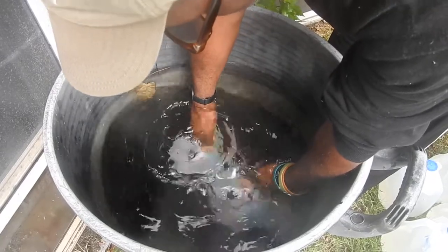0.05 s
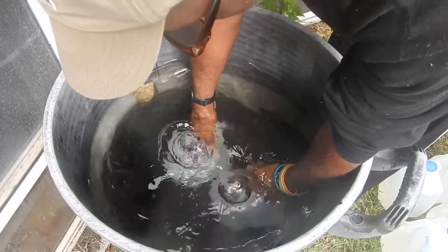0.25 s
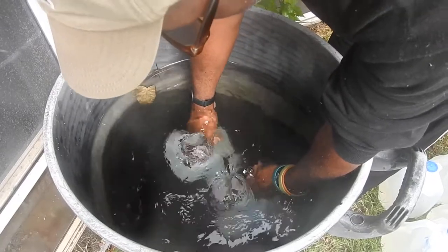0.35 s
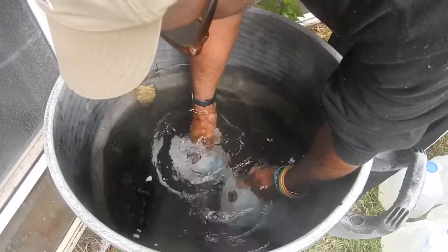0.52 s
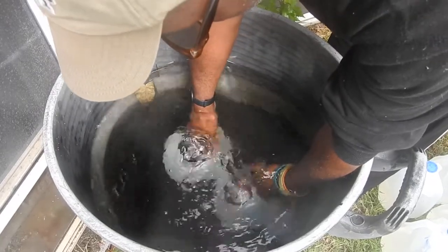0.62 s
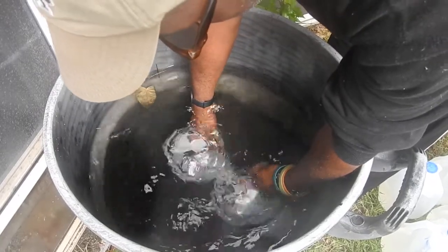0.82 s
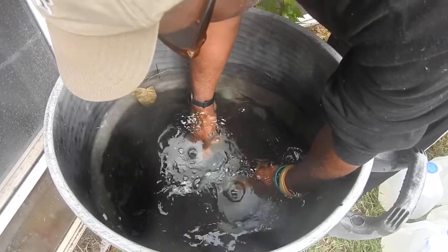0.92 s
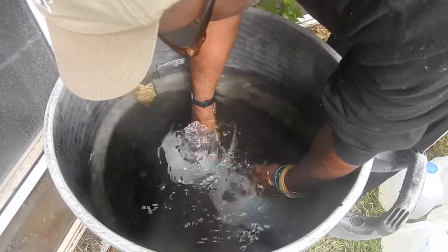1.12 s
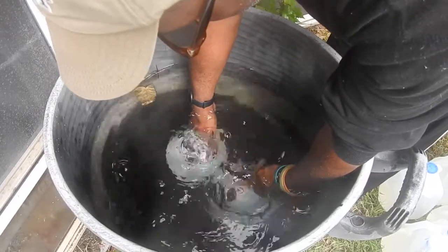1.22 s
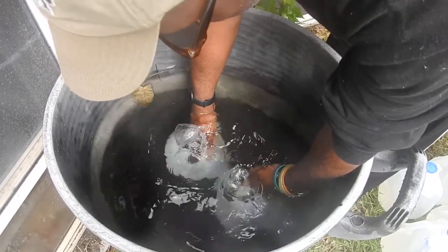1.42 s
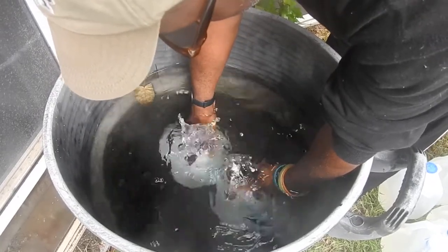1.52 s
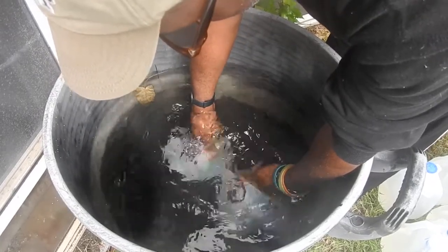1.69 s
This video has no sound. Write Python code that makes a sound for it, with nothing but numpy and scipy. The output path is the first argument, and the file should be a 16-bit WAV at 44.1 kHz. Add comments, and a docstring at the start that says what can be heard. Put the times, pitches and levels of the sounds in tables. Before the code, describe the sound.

Two bottles glug as they fill underwater in a tub, heard from just above. A faint glug and splash come first. At 0.2 seconds big bubbles start rising in overlapping pairs, each gliding up in pitch, the loudest crackling faintly. More pairs follow near 0.7, 1.0 and 1.4 seconds, with small splashes, drips and light fizz. After 1.5 seconds the last splashes and plinks fade over a low outdoor rumble.

```python
"""Two bottles held under water in a round tub fill, heard from just above over a low outdoor rumble.
A faint glug and a splash come first. At 0.2 s big air bubbles start leaving the necks in overlapping
pairs, each gliding up in pitch as it nears the surface; the loudest push a limiter into a faint crackle.
More pairs follow about every 0.4 s and burst in small splashes, as drops fall back over a light fizz.
After 1.5 s the last splashes, drops and plinks die away."""
import sys
import numpy as np
from scipy import signal
from scipy.io import wavfile
from scipy.ndimage import uniform_filter1d

SR = 44100
rng = np.random.default_rng(int(sys.argv[2]) if len(sys.argv) > 2 else 0)


def wrap_up_sound(samples):
    """Save the sound to the file named by the first command line argument, as 16-bit audio."""
    columns = np.atleast_2d(samples).T
    # keep every value between -1 and 1, then stretch to whole-number steps
    tamed = np.clip(columns, -1, 1)
    steps = np.round(tamed * 32767).astype(np.int16)
    wavfile.write(sys.argv[1], SR, steps)


N = 77175


def amp(db):
    """Decibels to amplitude ratio."""
    return 10 ** (np.asarray(db) / 20)


def unit(x):
    """Normalisation to rms 1."""
    return x / np.sqrt(np.mean(x ** 2) + 1e-20)


def add(mix, start, sound):
    """Superposition of a sound from start [s] on."""
    part = mix[max(round(start * SR), 0):][:len(sound)]
    part += sound[:len(part)]


def colour(x, curve, size=4096):
    """Minimum-phase filtering along a (frequency [Hz], gain [dB]) curve."""
    hz, db = np.transpose(curve)
    bin_hz = abs(np.fft.fftfreq(size, 1 / SR))
    log_gain = np.log(amp(np.interp(np.log(bin_hz + 1), np.log(hz), db)))
    taps = np.fft.ifft(np.exp(np.conj(signal.hilbert(log_gain)))).real[:size // 2]
    return signal.fftconvolve(x, taps)[:len(x)]


def decay(t, t60):
    """Exponential damping by 60 dB in t60 seconds."""
    return np.exp(-np.log(1000) * t / t60)


def ring(t, hz, t60=0.0076, rise_per_s=31, attack_cycles=0.44):
    """Damped oscillation, rising in pitch; the defaults give a drop's chirp."""
    attack = (1 - np.exp(-t * hz / attack_cycles)) ** 2
    return np.sin(2 * np.pi * hz * t * (1 + rise_per_s * t / 2)) * decay(t, t60) * attack


# Spectrum of outdoor rumble and stirred water (frequency [Hz], relative level [dB])
RUMBLE_SPECTRUM = [(25, -59), (39, -18), (65, 5.5), (200, -8), (430, -9), (1500, -18), (3000, -27),
                   (6500, -25.5), (10000, -45.5), (16000, -56)]

def rumble(level_db=-41.5, side_db=-20):
    """Broadband noise of the outdoors and stirred water, highly correlated between the ears."""
    mid, side = (unit(colour(rng.standard_normal(N), RUMBLE_SPECTRUM)) for _ in range(2))
    return amp(level_db) * (mid + amp(side_db) * np.array([side, -side]))


# Air modes of the tub (frequency [Hz], T60 [s], gain [ratio]); negative gains oppose the direct sound
AIR_MODES = [(191.6, 0.16, 0.92), (344.3, 0.16, 0.51), (532, 0.069, 0.6), (674.7, 0.099, -0.91),
             (942, 0.092, 1.35), (1141.6, 0.24, 1.73)]
# Spectrum of the wall echo (frequency [Hz], gain [dB])
WALL_REFLECTION = [(300, -26), (1200, -11), (7000, 2)]

def tub(x, wall_t60=0.036, wall_delay_s=0.0013):
    """Resonance and reflection: the air in the tub rings, and the wall sends quick echoes to each ear."""
    t = np.arange(SR // 5) / SR
    modes = sum(gain * 2 * np.log(1000) / t60 / SR * np.cos(2 * np.pi * hz * t) * decay(t, t60)
                for hz, t60, gain in AIR_MODES)
    x = x + signal.fftconvolve(x, modes)[:N]
    taps = rng.standard_normal((2, len(t))) * (rng.random((2, len(t))) < 0.1)
    taps *= decay(t, wall_t60) * (t > wall_delay_s)
    echoes = [signal.fftconvolve(x, ear / np.linalg.norm(ear))[:N] for ear in taps]
    return np.array([x + colour(echo, WALL_REFLECTION) for echo in echoes])


# Spectrum of fizz and splash spray (frequency [Hz], gain [dB])
SPRAY_SPECTRUM = [(400, -38), (1000, -5.5), (3700, -7), (5000, -5.5), (6800, -2), (8200, -18),
                  (16000, -53.5)]

def fizz(splash, pitches=32, bubbles_per_s=900, t60_cycles=45, steady_db=-57.5, churn_db=-2):
    """Shot noise: tiny bubbles ring at random times, louder around each splash."""
    ticks, t = np.zeros(N), np.arange(SR // 30) / SR
    for hz in np.geomspace(900, 14000, pitches):
        hits = rng.random(N) < bubbles_per_s / pitches / SR
        strengths = amp(4.5 * np.minimum(rng.exponential(size=N), 3.5))
        ticks += signal.oaconvolve(hits * strengths, hz * ring(t, hz, t60_cycles / hz))[:N]
    window = decay(abs(np.arange(-N, N) / SR), t60=0.25)
    churn = signal.fftconvolve(abs(splash), window / window.sum(), "same")
    return unit(colour(ticks, SPRAY_SPECTRUM)) * (amp(steady_db) + amp(churn_db) * churn)


# Big bubbles bursting at the surface (time [s], level [dB], T60 [s])
BURSTS = [(0.014, -27, 0.017), (0.1356, -29.5, 0.013), (0.404, -34, 0.096), (0.473, -30.5, 0.09),
          (0.843, -21.5, 0.062), (0.904, -20, 0.07), (1.3186, -20, 0.016), (1.459, -26.5, 0.06),
          (1.5299, -31, 0.018), (1.626, -23.5, 0.075), (1.651, -22.5, 0.025)]

def splashes(count=6, spray_db=2.5, grain_db=10, droplet_db=3.5, fade_db=11.5):
    """Impulsive excitation: each burst throws up grainy spray and droplets, the later ones weaker."""
    spray, droplets, t = np.zeros(N), np.zeros(N), np.arange(SR // 8) / SR
    for start, db, t60 in BURSTS:
        noise, grain = rng.standard_normal((2, len(t)))
        hiss = unit(noise * amp(grain_db * np.minimum(grain, 2)))
        add(spray, start, amp(db + spray_db) * decay(t, t60) * hiss)
        for k, (jitter, octaves) in enumerate(rng.random((count, 2))):
            lateness = (k + jitter) / count
            chirp = ring(t, hz=3640 * 2 ** octaves)
            add(droplets, start + lateness * t60 / 2, amp(db + droplet_db - fade_db * lateness) * chirp)
    return colour(spray, SPRAY_SPECTRUM) + droplets


# Short tones: bubble plinks and low hollow rings of the tub (time [s], frequency [Hz], level [dB], T60 [s])
RINGING_TONES = [(0.067, 2890, -31, 0.033), (.137, 1445, -17.5, 0.048), (0.285, 2940, -20, 0.011),
                 (0.339, 3160, -24.5, 0.017), (0.406, 1488, -27.5, 0.14), (.52, 548, -32, 0.091),
                 (.587, 1455, -32.5, 0.063), (0.836, 2300, -27.5, 0.046), (0.907, 1830, -13.5, 0.01),
                 (.911, 1600, -18, 0.017), (0.933, 1874, -29.5, 0.075), (0.969, 2206, -32, 0.079),
                 (1.176, 2857, -26.5, 0.027), (1.228, 397, -30.5, 0.15), (1.2721, 1046, -17, 0.019),
                 (1.320, 1978, -25, 0.046), (1.4614, 1250, -12, 0.012), (1.533, 3010, -15, 0.025),
                 (1.619, 393, -25, 0.12), (1.653, 2635, -21.5, 0.023), (1.676, 1320, -20.5, 0.013),
                 (1.698, 2850, -30, 0.063)]
# Single drops landing (time [s], frequency [Hz], level [dB])
FALLING_DROPS = [(0.0139, 6410, -20.5), (0.0399, 6420, -27), (.063, 5900, -26), (.119, 5720, -24),
                 (0.413, 6400, -23.5), (.444, 3880, -26.5), (.475, 4700, -22.5), (0.5627, 4650, -25.5),
                 (0.572, 5920, -23), (0.586, 6600, -27), (.791, 5730, -27.5), (.935, 5410, -19.5),
                 (1.153, 6080, -29), (1.1743, 5370, -20.5), (1.2707, 4490, -15.5), (1.2938, 5770, -12),
                 (1.3202, 5560, -11.5), (1.357, 4350, -22), (1.401, 6080, -18), (1.492, 5400, -21),
                 (1.534, 6250, -13.5), (1.649, 5680, -14), (1.686, 5330, -19)]

def plinks(spatter_db=-3):
    """Free oscillation: bubbles and the tub ring, drops chirp higher; noise modulation adds wet spatter."""
    out, t = np.zeros(N), np.arange(SR // 5) / SR
    tones = [ring(t, hz, t60, rise_per_s=0.91) for _, hz, _, t60 in RINGING_TONES]
    tones += [ring(t, hz) for _, hz, _ in FALLING_DROPS]
    for (start, hz, db, *_), tone in zip(RINGING_TONES + FALLING_DROPS, tones):
        spatter = unit(uniform_filter1d(rng.standard_normal(len(t)), round(2 * SR / hz)))
        add(out, start, amp(db) * tone * (1 + amp(spatter_db) * spatter * decay(t, t60=0.09)))
    return out


# Big bubbles rising (time [s], duration [s], first frequency [Hz], last frequency [Hz],
# glide exponent [1], level at knee [dB], swell before it [dB], knee [share of duration], fade after [dB])
RISING_BUBBLES = [(0.0, 0.07, 689.5, 1920, 1.8, -27.5, 3, 1, 4.5),
                  (0.2162, 0.13, 173.6, 876, 1.58, -1, 8, 0.53, 29),
                  (0.3001, 0.11, 199.2, 665, 1.39, -13, 0.5, 0.79, 3),
                  (0.454, 0.045, 681, 1280, 1.73, -40.5, -8, 0.99, 21),
                  (0.639, 0.18, 169, 599.7, 1.71, -12, 22, 0.13, 5.5),
                  (0.6938, 0.13, 231.8, 693, 1.003, -8, 6.5, 0.32, 16.5),
                  (0.866, 0.062, 720.6, 1555, 1.07, -42, -10.5, 0.62, -10.5),
                  (1.0187, .0715, 204.3, 908, 0.9, -17, -2.5, 0.75, 22.5),
                  (1.0326, 0.14, 171.9, 670.5, 1.57, -8.5, 8, 0.71, 22),
                  (1.4104, 0.053, 205.6, 1173, 1.05, -14, 7.5, 0.31, 10),
                  (1.4141, 0.085, 193.4, 853, .65, -13.5, -1, 0.62, 20.5),
                  (1.488, 0.033, 845, 1604, 0.914, -28.5, -14, 0.24, 5.5)]

def glugs(attack_s=0.0053, stop_db_per_s=900, flutter=0.45, full_flutter_hz=1000):
    """Bubble resonance: each big bubble's tone climbs as it nears the surface, fluttering as it goes."""
    out, t = np.zeros(N), np.arange(SR // 4) / SR
    for start, duration, first_hz, last_hz, bend, db, swell_db, knee, fade_db in RISING_BUBBLES:
        progress, knee = np.minimum(t / duration, 1), np.clip(knee, 0.02, 0.98)
        hz = first_hz * (last_hz / first_hz) ** (progress ** bend)
        level = db - swell_db * np.maximum(1 - progress / knee, 0)
        level -= fade_db * np.maximum(progress - knee, 0) / (1 - knee)
        level -= stop_db_per_s * np.maximum(t - duration, 0)
        envelope = amp(level) * (1 - np.exp(-t / attack_s))
        noise = rng.standard_normal((2, len(t)))
        slow_noise = unit(uniform_filter1d(uniform_filter1d(noise, 120), 120))
        gain_wobble, phase_wobble = slow_noise * flutter * np.minimum(hz / full_flutter_hz, 1) ** 2
        phase = 2 * np.pi * np.cumsum(hz) / SR + phase_wobble
        add(out, start, -envelope * (1 + gain_wobble) * np.sin(phase))
    return out


def scene():
    """Superposition: the water sounds excite the tub, over the rumble."""
    splash = splashes()
    return tub(glugs() + plinks() + splash + fizz(splash)) + rumble()


def record(dry, block=40, ceiling_db=-5.8, recovery_db_per_s=220, cutoff_hz=16250):
    """Peak limiting: abrupt gain steps make the loudest glugs crackle; a low-pass filter follows."""
    block_peaks = np.maximum.reduceat(abs(dry).max(axis=0), np.arange(0, N, block))
    peaks = np.repeat(block_peaks, block)[:N]
    over_db = np.maximum(20 * np.log10(peaks) - ceiling_db, 0)
    recovery = recovery_db_per_s * np.arange(N) / SR
    gain = amp(recovery - np.maximum.accumulate(over_db + recovery))
    lowpass = signal.firwin(511, cutoff_hz, window=("kaiser", 9), fs=SR)
    return signal.oaconvolve(dry * gain, lowpass[None], "same")


dry = scene()
out = record(dry)
wrap_up_sound(out)
```